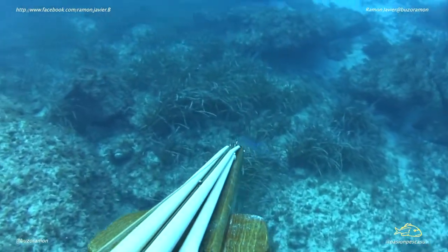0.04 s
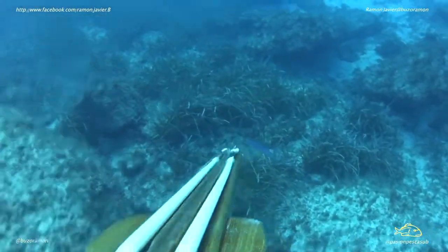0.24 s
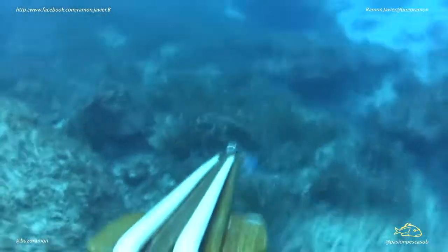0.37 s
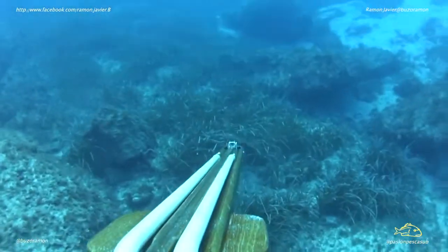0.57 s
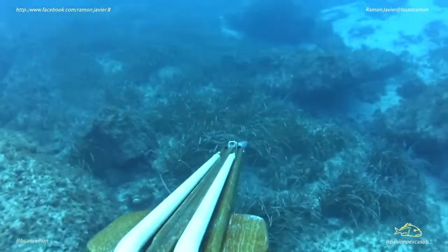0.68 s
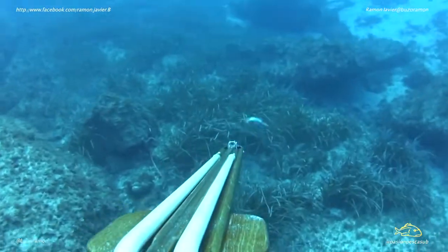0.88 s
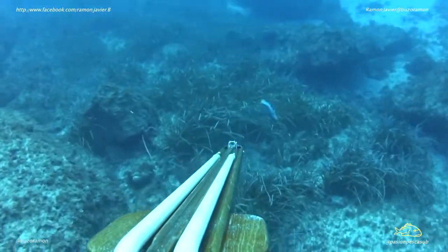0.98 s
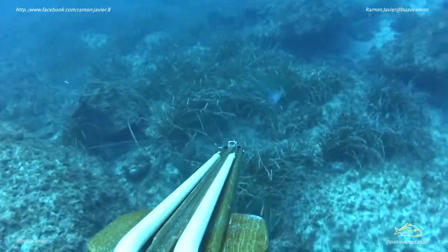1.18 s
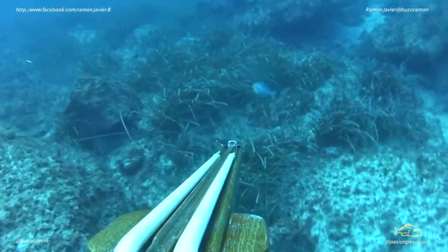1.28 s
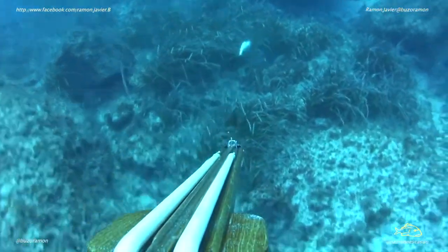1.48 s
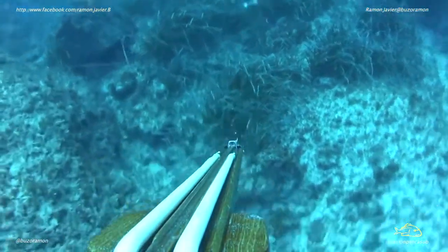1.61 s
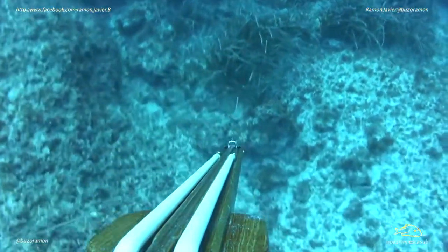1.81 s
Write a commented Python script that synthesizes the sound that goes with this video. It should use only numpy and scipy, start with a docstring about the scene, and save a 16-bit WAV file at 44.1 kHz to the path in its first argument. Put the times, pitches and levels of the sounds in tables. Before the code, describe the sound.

Underwater speargun shot, a close clattering snap with thumping rubber bands, dying away quickly.

```python
"""Under water, a speargun fires, heard through a camera housing fixed to the gun.
The catch lets go with a crack, the spear scrapes along its track and the rubber bands thrash and slap.
These forces excite the resonances of the housing, while steel parts ping and the stock hums on.
Afterwards the water-filled gun gulps, and loose line and fittings tick; one later crack and its
rebound stand out of faint hiss and handling noise."""
import sys
import numpy as np
from scipy import signal
from scipy.io import wavfile
from scipy.ndimage import uniform_filter1d

SR = 44100
rng = np.random.default_rng(int(sys.argv[2]) if len(sys.argv) > 2 else 0)


def transcribe(u):
    """Save the signal u as a 16-bit wav file named by the first command-line argument.

    u: samples, shape (n,) or (channels, n), limited to [-1, 1]; the rate is SR.
    q: integer samples, one column per channel.
    """
    v = np.clip(np.atleast_2d(u).T, -1, 1)
    q = np.round(v * 32767).astype(np.int16)
    wavfile.write(sys.argv[1], SR, q)


N = 81585
T = np.arange(N) / SR


def amp(db):
    """Decibels to amplitude ratio."""
    return 10 ** (np.asarray(db) / 20)


def unit(x):
    """Normalisation of each channel to rms 1."""
    return x / np.sqrt(np.mean(x ** 2, -1, keepdims=True) + 1e-30)


def add(mix, start, sound):
    """Superposition: a sound joins the mix at start [s]."""
    part = mix[:, round(start * SR):][:, :sound.shape[1]]
    part += sound[:, :part.shape[1]]


def envelope(table, column=1):
    """Gain interpolated along one dB column of a curve, silent outside it."""
    rows = np.array(table)
    return amp(np.interp(T, rows[:, 0], rows[:, column], left=-np.inf, right=-np.inf))


def decay(t, t60):
    """Exponential damping: a fall of 60 dB in t60 seconds."""
    return np.exp(-np.log(1000) * t / t60)


def width(side_db):
    """Gains of the middle (alike in both ears) and the side (opposed between them)."""
    return amp([[0], [side_db]])


def band(x, low_hz, high_hz):
    """Causal band-pass filter."""
    return signal.sosfilt(signal.butter(3, [low_hz, high_hz], "band", fs=SR, output="sos"), x)


def colour(x, spectrum, size=4096):
    """Minimum-phase filter: the peaks of the spectrum ring after the excitation."""
    hz, db = np.transpose(spectrum)
    bin_hz = abs(np.fft.fftfreq(size, 1 / SR)) + 1
    log_gain = np.log(amp(np.interp(np.log(bin_hz), np.log(hz), db)))
    impulse_response = np.fft.ifft(np.exp(np.conj(signal.hilbert(log_gain)))).real[:size // 2]
    return signal.fftconvolve(x, impulse_response)[:len(x)]


def grains(per_s, spread_db):
    """Shot noise: tiny random impacts of uneven size, weighted separately in middle and side."""
    sizes = amp(spread_db * np.minimum(rng.exponential(1, N), 3.4))
    hits = rng.random(N) < per_s / SR
    return sizes * hits * rng.standard_normal((2, N))


def housing(force):
    """Forced vibration: the case is squeezed (middle) and rocked (side), and rings in its modes."""
    # broad responses to squeezing and rocking: (frequency [Hz], gain [dB])
    squeezing = [(40, -17.5), (90, 7.5), (150, 2), (205, -6), (295, 4), (390, -2), (500, -6.5), (700, 3.5),
                 (830, 7), (1100, -4.5), (1550, -13.5), (1900, -12), (2250, -15.5), (2750, -11.5),
                 (3400, -24.5), (4200, -29), (5200, -39), (6400, -28), (7400, -33.5), (8500, -40),
                 (11000, -37)]
    rocking = [(40, -21.5), (130, -4.5), (250, -9), (380, -10.5), (510, -4.5), (630, 6), (740, -4.5),
               (850, -1), (1000, -8), (1350, -7), (1900, -14), (2750, -12.5), (3500, -27.5), (5200, -35.5),
               (6400, -23.5), (8000, -42), (11000, -46.5)]
    # narrow resonances: (frequency [Hz], t60 [s], middle gain [dB], side gain [dB])
    case_modes = [(303.7, 0.17, -10.5, -11), (434, .1, -3, -8), (670, 0.13, -13.5, -4.5),
                  (678, 0.093, -5.5, -10), (713.8, 0.042, -3, -10.5), (816, 0.077, 0, -5.5),
                  (969, 0.092, -5.5, -8), (1102, 0.07, -1, 2), (1228, 0.11, 2.5, -4),
                  (1348, 0.057, -5.5, 3.5), (1670, 0.067, -2.5, 1), (1770, 0.011, -10.5, -0.5),
                  (2202, 0.053, 4, -2), (2674, 0.041, -0.5, 0.5)]
    broad = np.array([colour(force[0], squeezing), colour(force[1], rocking)])
    rings = 0
    for hz, t60, mid_db, side_db in case_modes:
        radius = decay(1 / SR, t60)
        pole = radius * np.exp(2j * np.pi * hz / SR)
        resonance = 2 * signal.lfilter([1 - radius], [1, -pole], broad).real
        rings = rings + amp([[mid_db], [side_db]]) * resonance
    return broad + rings


def background(mid_db=-67.5, side_db=-61.5, waver_db=5.5):
    """Filtered noise: steady hiss, water stirring the housing, and the hand shifting on the grip."""
    # spectra of the hiss and the handling noise: (frequency [Hz], relative level [dB])
    mid_spectrum = [(20, 3.5), (40, 9), (70, -7.5), (130, 1), (190, -5.5), (300, 2.5), (430, -1.5),
                    (700, 3), (1100, -0.5), (2500, -5), (5000, -10), (11000, -12.5)]
    side_spectrum = [(20, -7.5), (80, -5), (150, 3.5), (220, -1.5), (400, 0), (520, 7.5), (600, 18),
                     (700, 7), (1000, 7), (2000, 0), (4000, -10), (11000, -21)]
    grip_spectrum = [(20, -14.5), (40, -1.5), (70, -22), (132, 2), (190, -21), (300, 1), (450, -16.5),
                     (700, -6), (1500, -26), (6000, -51)]
    # course of the handling noise: (time [s], level [dB])
    grip_levels = [(0, -78.5), (.17, -69.5), (.9, -85.5), (1.1, -74), (1.35, -70.5), (1.42, -75.5),
                   (1.52, -60.5), (1.65, -65), (1.74, -66), (1.85, -87)]
    noise = rng.standard_normal((5, N))
    hiss = unit(np.array([colour(noise[0], mid_spectrum), colour(noise[1], side_spectrum)]))
    hiss *= amp([[mid_db], [side_db]])
    drift = unit(uniform_filter1d(uniform_filter1d(noise[4], size=1200), size=800))
    lows = signal.sosfiltfilt(signal.butter(2, 1000, fs=SR, output="sos"), hiss)
    stirring = lows * (amp(waver_db * drift) - 1)  # only the low part of the hiss wavers
    grip = unit(np.array([colour(channel, grip_spectrum) for channel in noise[2:4]]))
    grip_gain = amp(np.interp(T, *np.transpose(grip_levels)))
    return hiss + stirring + grip * grip_gain * width(side_db=0.5)


def impacts(table, stretch, snap=4.26, level_span_s=0.0028, size=4096):
    """Impulse response: each hit and its brief rattle ring the housing; stretch lengthens the rattle."""
    # thud, ring, clack and sizzle bands:
    # (low edge [Hz], high edge [Hz], time constant before stretch [s], side re middle [dB])
    bands = [(204, 446, 0.0016, -4), (500, 1036, 0.0032, 4.5), (1100, 5500, 0.0034, 1),
             (3620, 8880, 0.0036, -4.5)]
    out, t = np.zeros((2, N)), np.arange(size) / SR
    span_gain = np.sqrt(level_span_s * SR / size)  # a level is the rms of the energy put into this span
    for start, rock_db, *levels in table:
        for db, (low_hz, high_hz, tau, side_db) in zip(levels, bands):
            force = rng.standard_normal((2, size)) * np.exp(-t / (tau * stretch))
            force[0, 0] += snap  # first contact
            response = unit(band(housing(force), low_hz, high_hz))
            add(out, start, response * span_gain * amp(db) * width(side_db + rock_db))
    return out


def loose_fittings():
    """Structure-borne sound: loose line and fittings knock on the gun with a slack rattle."""
    # knocks: (time [s], rocking of the case [dB], thud [dB], ring [dB], clack [dB], sizzle [dB])
    knocks = [(.521, 2, -51, -44, -60, -76), (.549, 1, -50.5, -56, -46, -59.5),
              (.584, 2, -50.5, -67, -55, -72), (.606, 2, -59, -50.5, -54, -86),
              (.637, -2, -76, -52, -54, -72), (.659, -5, -68, -60, -57.5, -64.5),
              (.761, -8, -62, -74, -56.5, -67), (.822, -10, -69, -57, -53, -62),
              (.917, -6, -77, -65, -54, -61.5), (1.353, 0, -58, -84, -73, -65),
              (1.513, 8, -65, -52, -47.5, -76), (1.533, 0, -56, -43.5, -47, -63),
              (1.781, 6, -58, -62, -81.5, -79.5)]
    return impacts(knocks, stretch=2.5)


def plops(rise_s=0.0046, pitch_scatter=0.015):
    """Damped resonance: the water-filled gun gulps; the top mode dies first, the lower ones beat on."""
    # hollow gulps: (time [s], level [dB])
    gulps = [(.474, -41), (.519, -39.5), (.549, -40.5), (.604, -49), (.695, -58.5), (.759, -57),
             (1.421, -58.5), (1.534, -45)]
    # their resonances: (frequency [Hz], t60 [s], middle gain [dB], side gain [dB])
    gulp_modes = [(816, 0.03, -0.5, -4), (679, 0.044, -2.5, 4.5), (580, 0.075, -25, 2)]
    out, t = np.zeros((2, N)), T[:SR // 8]
    for start, db in gulps:
        for hz, t60, mid_db, side_db in gulp_modes:
            swell = (1 - np.exp(-t / rise_s)) * decay(t, t60)
            pitch = hz * (1 + pitch_scatter * rng.uniform(-1.1, 1))
            tone = np.sin(2 * np.pi * (pitch * t + rng.random((2, 1))))
            add(out, start, tone * swell / swell.max() * amp(db) * amp([[mid_db], [side_db]]))
    return out


def late_crack(start=1.4964, lag_cycles=1.3):
    """Modal ringing after a hard contact, probably spear on rock: high modes lead, low ones follow."""
    # modes of the crack: (frequency [Hz], level [dB], t60 [s])
    crack_modes = [(319, -38.5, 0.058), (653, -37.5, 0.053), (839, -39, 0.069), (1160, -25, 0.016),
                   (1760, -38, 0.029), (2270, -31, 0.019), (2664, -32, 0.017), (3420, -36, 0.0071),
                   (6400, -58.5, .014)]
    out = np.zeros((2, N))
    for hz, db, t60 in crack_modes:
        tone = np.sin(2 * np.pi * (hz * T + rng.random((2, 1))))
        onset = 1 - np.exp(-(hz * T) ** 2)
        add(out, start + lag_cycles / hz, tone * onset * decay(T, t60) * amp(db))
    return out


def stock():
    """Free vibration: each jolt sets the low bending modes of the gun humming."""
    # bending modes: (frequency [Hz], t60 [s], side re middle [dB], side lag [rad])
    bending_modes = [(37.3, 0.89, -9.5, 1.1), (82.4, 0.39, -0.5, 1.5), (132.72, .5, 2.5, 3.1)]
    # recoil, bands running out, bands slapping back, two later tugs:
    # (time [s], rise [s], first mode [dB], second mode [dB], third mode [dB])
    jolts = [(.205, 0.021, -42.5, -59, -23), (0.303, .028, -50.5, -21.5, -44.5),
             (0.371, 0.028, -39, -25.5, -51), (0.513, 0.034, -54.5, -46, -46),
             (1.584, 0.027, -71, -74.5, -62)]
    out = np.zeros((2, N))
    for start, rise, *levels in jolts:
        onset = np.minimum(T / rise, 1)
        for db, (hz, t60, side_db, lag) in zip(levels, bending_modes):
            swing = unit(np.sin(2 * np.pi * hz * T - np.array([[0], [lag]])))
            add(out, start, swing * onset * decay(T, t60) * amp(db) * width(side_db))
    return out


def rubber_bands():
    """Random excitation: the slack bands flutter through the water in dull thumps."""
    # course of the churning: (time [s], level [dB])
    thrash = [(.195, -63), (.215, -30.5), (.27, -26), (.32, -20.5), (.39, -25), (.425, -35), (.45, -42.5),
              (.55, -56), (.72, -75.5)]
    thumps = band(housing(grains(per_s=900, spread_db=5.0)), low_hz=79, high_hz=460)
    return unit(thumps) * envelope(thrash) * width(side_db=-5.5)


def steel_pings(rise_s=0.0022, chatter_share=0.55, half_band_hz=450):
    """Damped ringing: catch, shaft and wishbone ping when struck, roughened by narrow-band chatter."""
    # rings of the steel parts: (time [s], frequency [Hz], level [dB], t60 [s])
    pings = [(0.2096, 6370, -28, 0.039), (.215, 7100, -30, 0.018), (0.235, 6410, -19, 0.017),
             (0.408, 6640, -42, 0.028), (0.447, 4100, -37.5, 0.061), (0.449, 6990, -40.5, 0.048)]
    out = np.zeros((2, N))
    onset = np.minimum(T / rise_s, 1)
    for start, hz, db, t60 in pings:
        chatter = unit(band(rng.standard_normal((2, N)), hz - half_band_hz, hz + half_band_hz))
        tone = np.sin(2 * np.pi * (hz * T + rng.random((2, 1))))
        ring = (1 - chatter_share) * tone + chatter_share * chatter
        add(out, start, ring * onset * decay(T, t60) * amp(db) * width(side_db=-8))
    return out


def spear_scrape(fizz_db=-14):
    """Sliding friction: the shaft chatters along its track, and the housing rings under the grit."""
    # course of the slide: (time [s], ring level [dB], grit level [dB])
    slide = [(.195, -63.5, -66), (.212, -36.5, -37), (.245, -19.5, -31.5), (.285, -17.5, -30),
             (.33, -28, -30), (.365, -37.5, -30.5), (.405, -41, -36), (.44, -43, -45), (.485, -51.5, -53.5),
             (.57, -62, -69.5), (.72, -68, -76)]
    # ring, grit and fizz bands: (low edge [Hz], high edge [Hz])
    bands = [(500, 1160), (1150, 4290), (3900, 9000)]
    scrape = housing(grains(per_s=2800, spread_db=0.5))
    ring, grit, fizz = (unit(band(scrape, *edges)) for edges in bands)
    rasp = grit * width(side_db=-0.5) + fizz * amp(fizz_db) * width(side_db=-2.5)
    return ring * envelope(slide) * width(side_db=3.5) + rasp * envelope(slide, column=2)


def shot():
    """Impact excitation: the catch lets go and a rapid train of metal blows rings the housing."""
    # blows: (time [s], rocking of the case [dB], thud [dB], ring [dB], clack [dB], sizzle [dB])
    blows = [(.1972, -1, -37, -41.5, -44, -64), (.2105, 0, -29, -22.5, -37.5, -43),
             (.2145, 3.5, -37, -13.5, -14.5, -27.5), (.2185, -7, -27, -20.5, -16, -32.5),
             (.2225, 0.5, -32, -39.5, -24.5, -28.5), (.2355, 0.5, -27.5, -20.5, -20, -32.5),
             (.243, -0.5, -18.5, -18.5, -22, -49.5), (.2525, 0.5, -23, -12.5, -28.5, -57),
             (.2678, -0.5, -28, -14.5, -18.5, -29.5), (.2765, 0.5, -37.5, -19.5, -31.5, -55.5),
             (.2835, -1, -13.5, -16.5, -25, -39), (.2895, -1.5, -30.5, -14, -22.5, -39.5),
             (.303, 0, -28, -36, -32, -39), (.3125, 2, -16, -18.5, -33, -43),
             (.3255, -4, -24, -21.5, -29, -37.5), (.330, -3.5, -21.5, -23.5, -27, -37),
             (.339, -1.5, -15, -29.5, -34.5, -39), (.358, -3.5, -20, -19, -22.5, -43),
             (.3625, 3, -31, -27.5, -27, -42.5), (.3755, 3, -23.5, -25.5, -30, -48),
             (.3885, -1.5, -20, -25, -23, -41), (.4075, -5, -18, -20.5, -23, -39),
             (.4128, -3.5, -17.5, -37.5, -24, -53.5), (.4225, -4.5, -24.5, -45.5, -32.5, -48.5),
             (.445, -11, -43, -36.5, -37, -45), (.450, 0, -53, -35.5, -35, -46),
             (.470, -2, -39, -50, -32.5, -39), (.4735, 2, -62, -48, -37.5, -42.5),
             (.498, -14, -51.5, -51, -42.5, -61), (.5055, 2.5, -68, -61, -47, -54)]
    return impacts(blows, stretch=0.83)


def scene():
    """Superposition of all sources as middle and side; their sum and difference are left and right."""
    mid, side = (shot() + loose_fittings() + spear_scrape() + rubber_bands() + stock()
                 + background() + steel_pings() + plops() + late_crack())
    return np.array([mid + side, mid - side])


def record(dry, ceiling=0.95, knee=4, cutoff_hz=11300):
    """Soft saturation rounds the highest peaks; a low-pass filter then limits the bandwidth."""
    rounded = dry / (1 + abs(dry / ceiling) ** knee) ** (1 / knee)
    low_pass = signal.firwin(301, cutoff_hz, window=("kaiser", 8), fs=SR)
    return signal.oaconvolve(rounded, low_pass[None], "same")


dry = scene()
out = record(dry)
transcribe(out)
```